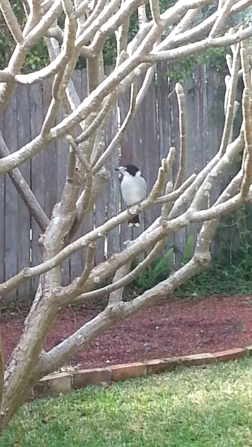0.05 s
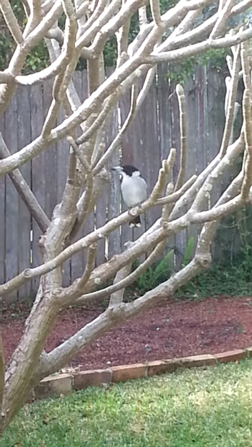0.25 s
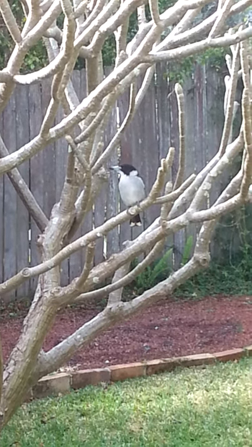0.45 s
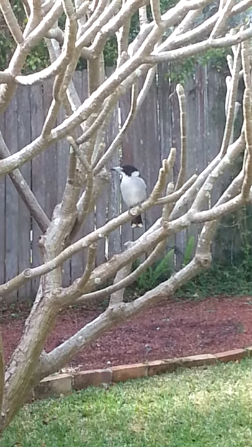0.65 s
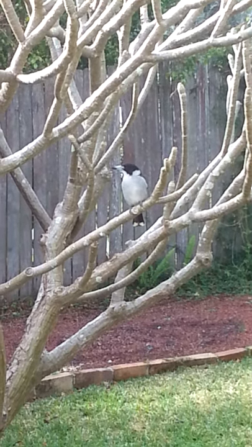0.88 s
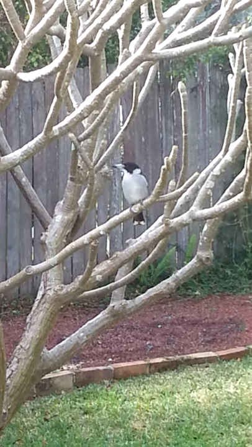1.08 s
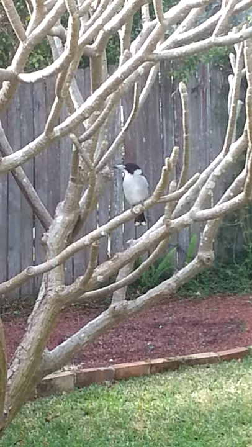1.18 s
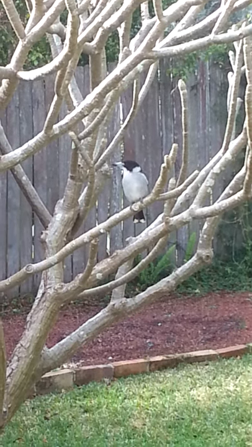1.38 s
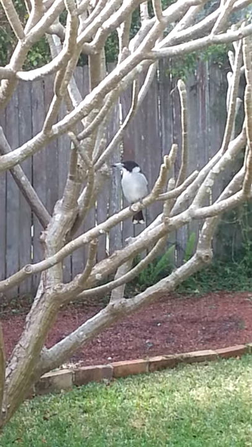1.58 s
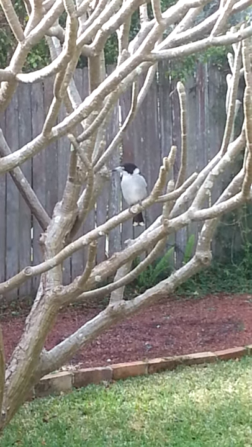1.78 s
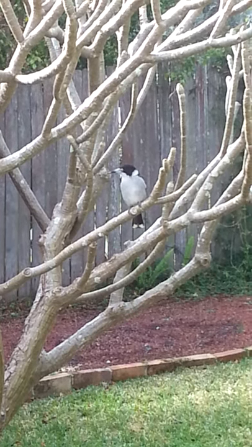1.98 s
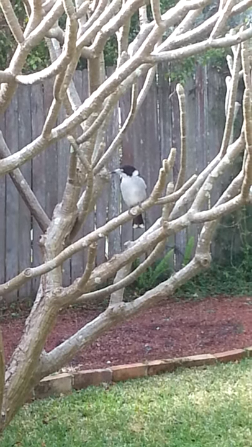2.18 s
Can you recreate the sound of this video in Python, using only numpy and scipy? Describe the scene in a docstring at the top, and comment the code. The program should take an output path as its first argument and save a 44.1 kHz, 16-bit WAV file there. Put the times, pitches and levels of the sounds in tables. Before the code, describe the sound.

Bird song at moderate distance in a backyard, picked up in stereo: clear falling whistle first, then harsh churr, nasal buzz, quick yelp, rough bark and low fluted notes, with faint outdoor wash and low hum.

```python
"""Butcherbird on a garden branch

A butcherbird sings a quiet phrase: gliding whistles and fluted notes between harsh rasps.
Whistles are a few harmonics on a jittering pitch glide; rasps drive throat resonances with pulses and noise.
The fence and house walls throw each note back as single echoes and a diffuse tail.
Behind it lie shaped noise as a soft outdoor wash and hiss, and a wavering sine as a faint low hum."""
import sys
import numpy as np
from scipy import signal
from scipy.fft import rfft, irfft
from scipy.io import wavfile
from scipy.ndimage import uniform_filter1d

SR = 44100
rng = np.random.default_rng(int(sys.argv[2]) if len(sys.argv) > 2 else 0)


def dump(signal):
    """Clip the signal to [-1, 1] and save it as 16-bit WAV at the path in sys.argv[1]."""
    limited = np.clip(np.atleast_2d(signal).T, -1, 1)
    pcm = np.round(limited * 32767).astype(np.int16)
    wavfile.write(sys.argv[1], SR, pcm)


N = 99225  # 2.25 s


def amp(db):
    """Decibels to gain."""
    return 10 ** (np.asarray(db) / 20)


def unit(x):
    """Scales to rms 1."""
    return x / np.sqrt(np.mean(x ** 2) + 1e-20)


def read(points, hz):
    """Reads a table on a log-frequency axis."""
    f, v = np.transpose(points)
    return np.interp(np.log(hz + 1), np.log(f + 1), v)


def shaped(x, db):
    """Filters by a gain curve in dB over the whole spectrum."""
    return irfft(rfft(x) * amp(db), N)


def wander(hz):
    """Smooth random motion up to a given rate, rms 1."""
    f = np.fft.rfftfreq(N, 1 / SR)
    return unit(irfft(rfft(rng.standard_normal(N)) / np.sqrt(1 + (f / hz) ** 6), N))


# Spectrum of outdoor wash and hiss. Each row: frequency in Hz, relative density in dB per Hz.
WASH = [(15, -26), (25, -17), (34, -25.5), (65, -28), (97, -19.5), (161, -13), (227, -7.5), (454, -6.5),
        (732, -11.5), (815, -5.5), (906, -10), (1150, -8), (2300, -17), (2700, -16.5), (4240, -18),
        (6480, -18), (14400, -20.5)]
# Level of the low wash over time. Each row: time in seconds, boost in dB at the lowest frequencies.
LOW_LEVEL = [(0, 4.5), (.25, 7), (.3, 11.5), (.44, 10), (.55, 7.5), (.8, 2.5), (.9, -3), (1.05, 6),
             (1.25, -0.5), (1.55, 6.5), (1.8, -1.5), (2.1, 3), (2.25, -3)]
# Likeness of the two microphones' wash. Each row: frequency in Hz, left-right correlation from 0 to 1.
LIKENESS = [(30, 0.17), (120, 0.68), (500, 0.69), (1200, 0.13), (3000, 0.067), (12000, 0.017)]
# Lean of the wash to one side. Each row: frequency in Hz, left over right in dB.
WASH_PAN = [(60, -1.5), (300, -3), (1000, -0.5), (12000, -1)]
WASH_DB = -61  # level before the low part's changes
LOW_TOP_HZ = 970  # the low boost in dB is halved here and fades above


def wash():
    """Distant outdoor noise over even hiss; its low part is louder around the bird's notes and lower in the
    gaps, as a table sets."""
    hz, t, z = signal.stft(rng.standard_normal((2, N)), SR, nperseg=2048)
    common = np.clip(read(LIKENESS, hz), -1, 1)[:, None]
    pan = read(WASH_PAN, hz)[:, None] / 2
    left = z[0] * amp(pan)
    right = (common * z[0] + np.sqrt(1 - common ** 2) * z[1]) * amp(-pan)
    steady = np.array([left, right]) * amp(read(WASH, hz))[:, None]
    scale = signal.istft(steady, SR)[1].mean(0).std()
    low_db = np.interp(t, *np.transpose(LOW_LEVEL)) / (1 + (hz[:, None] / LOW_TOP_HZ) ** 2)
    return amp(WASH_DB) / scale * signal.istft(steady * amp(low_db), SR)[1][:, :N]


# Loudness of the low hum. Each row: time in seconds, rms level in dB.
HUM = [(0, -89), (1.35, -81.5), (1.471, -69), (1.681, -72), (1.879, -80.5), (2.0, -75), (2.25, -85.5)]
HUM_HZ = 119  # mean pitch


def hum():
    """A faint sine of wavering pitch, the same at both microphones, strongest in the second half."""
    phase = 2 * np.pi * np.cumsum(HUM_HZ * (1 + 0.017 * wander(6.6))) / SR
    return unit(np.sin(phase)) * amp(np.interp(np.arange(N) / SR, *np.transpose(HUM)))


EDGE_S = 0.0032  # fade just outside each end of a gesture
JITTER_HZ, THROB_HZ = 306, 96  # fastest pitch jitter, mean throb rate


def syrinx(gesture, jitter, throb):
    """Phase and loudness of the syrinx: a jittering pitch glide with a fast throb."""
    t = np.arange(N) / SR
    s, hz, db = np.transpose(gesture)
    pitch = np.interp(t, s, hz) * (1 + jitter * wander(JITTER_HZ))
    phase = 2 * np.pi * np.cumsum(pitch) / SR
    throb_phase = 2 * np.pi * np.cumsum(THROB_HZ * (1 + 0.1 * wander(33))) / SR
    beat = unit(1 + throb * np.sin(throb_phase))
    gate = np.clip(np.minimum(t - s[0], s[-1] - t) / EDGE_S + 1, 0, 1)
    return phase, beat * gate * amp(np.interp(t, s, db))


# Gestures of the syrinx, one table per whistled note.
# Each row: time in seconds, pitch in Hz before jitter, relative level in dB at the bird.
CHIP = [(.115, 1920, -68), (.13, 2095, -62.5), (.142, 1645, -57.5), (.155, 1650, -70)]
NASAL = [(.165, 1244, -59), (.183, 1281, -54), (.204, 1192, -48.5), (.214, 1170, -52)]
LEAD_IN = [(.212, 2800, -57), (.235, 2597, -50.5), (.252, 2624, -49), (.27, 2554, -43.5), (.295, 2600, -52)]
ARCH = [(.267, 2745, -43.5), (.272, 2977, -44.5), (.279, 3294, -55), (.289, 3483, -48), (.298, 3104, -42),
        (.308, 2708, -39)]
WHISTLE = [(.306, 2660, -39), (.313, 2691, -32), (.323, 2685, -43), (.335, 2619, -32), (.344, 2550, -36),
           (.352, 2404, -47.5), (.379, 2356, -32), (.39, 2104, -55)]
UNDERTONE = [(.88, 867, -115), (.897, 855.5, -51.5), (.93, 856, -111), (.975, 848, -67), (1.0, 826, -56.5),
             (1.05, 805, -75), (1.12, 842, -54), (1.16, 874, -64)]
SLUR = [(.925, 1952, -67), (.942, 1697, -52.5), (.968, 1520, -61)]
BUZZ = [(.968, 1316, -55.5), (.99, 1334, -43.5), (1.019, 1358, -43), (1.034, 1389, -48), (1.05, 1303, -53),
        (1.078, 1310, -51.5)]
YELP = [(1.332, 1108, -57), (1.341, 1343, -51), (1.351, 1655, -42), (1.358, 1743, -38.5),
        (1.368, 1225, -47.5), (1.379, 1008, -49), (1.39, 1066, -47), (1.401, 920, -43), (1.423, 874, -44)]
SECOND_VOICE = [(1.36, 1770, -53), (1.385, 1676, -57), (1.398, 1662, -46), (1.412, 1800, -52)]
FLUTE = [(1.883, 971, -61), (1.902, 1048, -54.5), (1.916, 921, -55.5), (1.939, 975, -40.5),
         (1.951, 871, -44), (1.974, 901, -43.5), (1.992, 858, -46.5), (2.0, 865, -62)]
LIFT = [(2.015, 1269, -56.5), (2.038, 1430, -59), (2.06, 1613, -61.5), (2.074, 1460, -52.5),
        (2.082, 1410, -77)]
LAST = [(2.18, 1552, -73), (2.205, 1615, -64), (2.235, 1676, -57.5), (2.25, 1650, -70)]
PIP = [(2.185, 2340, -71), (2.195, 2260, -62), (2.208, 2000, -64)]
# The whistled notes. Each row: gesture, pitch jitter as an rms share, throb depth from 0 to 1,
# roughness from 0 to 1, list of relative harmonic levels in dB at full effort.
NOTES = [ (CHIP, 0.016, 0.11, 0.31, [0]), (NASAL, 0.016, 0.11, 0.42, [-2, -3, -4.5, -11, -17]),
         (LEAD_IN, .01, 0.094, 0.43, [0]), (ARCH, .007, .1, .18, [0, -8, -26]),
         (WHISTLE, .003, .05, .04, [0, -21, -28, -35]), (SLUR, 0.039, 0.38, 0.56, [0]),
         (BUZZ, 0.0333, 0.29, 0.71, [-9.5, -7.5, -16.5, -23, -29]), (UNDERTONE, 0.018, 0.073, 0.41, [0]),
         (YELP, 0.0195, 0.12, 0.37, [0]), (SECOND_VOICE, 0.0298, 0.18, 0.28, [0]),
         (FLUTE, 0.018, 0.074, 0.27, [0, -19.5]), (LIFT, 0.0085, 0.15, 0.43, [0]),
         (LAST, 0.011, 0.093, 0.17, [0]), (PIP, 0.016, .1, 0.26, [0])]
ROUGH_HZ = 121  # fastest flutter of a rough voice
MELLOW = 0.23  # overtones fade faster than the fundamental as effort falls (extra dB per dB, per octave)


def note(gesture, jitter, throb, rough, harmonics_db):
    """A few harmonics, brighter with effort, each fluttering on its own as the voice roughens."""
    phase, level = syrinx(gesture, jitter, throb)
    on, out = level > 0, np.zeros(N)
    s, _, effort_db = np.transpose(gesture)
    ease_db = MELLOW * (np.interp(np.flatnonzero(on) / SR, s, effort_db) - effort_db.max())
    flutter = wander(ROUGH_HZ) + 1j * wander(ROUGH_HZ)
    rough = np.clip(rough, 0, 1)
    for k, db in enumerate(harmonics_db, 1):
        # each harmonic takes the flutter from another moment
        own_flutter = np.roll(flutter, k * N // len(harmonics_db))[on] / np.sqrt(2)
        sway = 1 - rough + rough * own_flutter
        harmonic = unit((sway * np.exp(1j * k * phase[on])).real)
        out[on] += amp(db + ease_db * np.log2(k)) * harmonic
    out[on] = unit(out[on])
    return out * level


# Colour of the breath hiss. Each row: frequency in Hz, relative gain in dB.
AIR = [(100, -30), (300, -42), (1200, -4), (4000, 5), (14000, -19)]
AIR_DB = -26  # relative to the voice


def air(voice):
    """A faint hiss that rises and falls with the voice."""
    level = np.sqrt(abs(uniform_filter1d(voice ** 2, size=400)))  # 9 ms rms
    hiss = unit(shaped(rng.standard_normal(N), read(AIR, np.fft.rfftfreq(N, 1 / SR))))
    return amp(AIR_DB) * level * hiss


# Lean of the bird to one side. Each row: frequency in Hz, left over right in dB.
BIRD_PAN = [(700, -2), (1400, 0), (2000, -0.5), (2750, 6), (3300, 0), (4200, -3), (6000, -12), (9000, 3.5)]
MIC_LAG_S = .00009


def at_microphones(bird):
    """The bird reaches the left microphone slightly later, each band leaning to one side."""
    hz = np.fft.rfftfreq(N, 1 / SR)
    pan = read(BIRD_PAN, hz) / 2
    late = irfft(rfft(bird) * np.exp(-2j * np.pi * hz * MIC_LAG_S), N)
    return np.array([shaped(late, pan), shaped(bird, -pan)])


# Single reflections. Each row: mean delay in seconds, gain at left, gain at right.
ECHOES = [(.0062, 0.18, 0.27), (0.014, 0.14, .15), (0.0206, .19, .19), (0.035, 0.16, 0.21),
          (0.042, 0.23, 0.17), (.092, .1, 0.14), (0.129, .07, .07)]
# Decay of the diffuse tail. Each row: frequency in Hz, time to fall 60 dB in seconds.
GARDEN_T60 = [(300, 0.85), (1000, 0.37), (2500, 0.45), (5000, 0.17), (14000, 0.66)]
# Colour of the diffuse tail. Each row: frequency in Hz, relative gain in dB.
TAIL_COLOUR = [(300, -19), (900, 0), (1600, 0.5), (2700, -1.5), (4500, -3), (14000, 2)]
GARDEN_DB, DIRECT_DB = -1.5, -1  # gains of tail and direct sound
TAIL_RISE_S = 0.007


def garden(x):
    """Direct sound, slaps from ground and fence, and a diffuse tail from walls and foliage."""
    out = amp(DIRECT_DB) * x
    for delay, left, right in ECHOES:
        for ch, gain in enumerate((left, right)):
            # each path strays by about 0.3 ms
            lag = round(abs(delay + .0003 * rng.standard_normal()) * SR) + 1
            out[ch, lag:] += gain * x[ch, :-lag]
    hz, t, z = signal.stft(rng.standard_normal((2, SR)), SR, nperseg=256)
    decay_db = -60 * t / read(GARDEN_T60, hz)[:, None]
    rise = np.minimum(t / TAIL_RISE_S, 1)
    z = z * amp(read(TAIL_COLOUR, hz)[:, None] + decay_db) * rise
    tail = signal.istft(z, SR, nperseg=256)[1]
    tail /= np.sqrt(SR * .5 / np.log(1e6))  # energy of plain noise falling 60 dB in 0.5 s
    return out + amp(GARDEN_DB) * signal.fftconvolve(x, tail, axes=1)[:, :N]


# Gestures of the rasps. Each row: time in seconds, pitch in Hz before jitter, relative level in dB at the bird.
CHURR = [(.53, 905, -61.5), (.575, 929.7, -54.5), (.6, 977.6, -45), (.618, 966, -49), (.638, 989, -45.5),
         (.655, 958, -52)]
BARK = [(1.534, 1046, -52), (1.546, 1064, -41.5), (1.56, 1017, -38.5), (1.573, 901, -47.5),
        (1.6, 800, -46.5)]
# The rasps. Each row: gesture, pitch jitter as an rms share, turbulence in dB relative to the pulses,
# brightness in dB per octave.
RASPS = [(CHURR, 0.13, -0.88, 0), (BARK, 0.0754, 0.66, -0.72)]
# Throat resonances during a rasp. Each row: frequency in Hz, relative gain in dB before brightness.
THROAT = [(80, -55), (300, -41), (680, -11.5), (860, 1), (1020, -9), (1350, -12.5), (1720, -0.5),
          (2170, -3), (2430, -11), (2680, -9.5), (3480, -16), (3750, -8), (4050, -11.5), (4400, -16),
          (5300, -23), (5950, -16), (6400, -21), (7800, -25), (14000, -34)]
RASP_THROB = 0.57  # depth, 0 to 1


def rasp(gesture, jitter, air_db, tilt_db):
    """Chaotic pulses and turbulent air ring the resonances of the throat."""
    phase, level = syrinx(gesture, jitter, RASP_THROB)
    hz = np.fft.rfftfreq(N, 1 / SR)
    pulses = unit(sum(np.cos(k * phase) for k in range(1, 13)))
    drive = pulses + amp(air_db) * rng.standard_normal(N)
    return level * unit(shaped(drive, read(THROAT, hz) + tilt_db * np.log2(hz + 1)))


def scene():
    """The bird's voice and breath, heard in the garden over the wash and hum."""
    voice = sum(note(*row) for row in NOTES) + sum(rasp(*row) for row in RASPS)
    bird = voice + air(voice)
    return garden(at_microphones(bird)) + wash() + hum()


CUT_HZ = 14550


def record(dry):
    """The recorder's band limit, a steep low-pass."""
    low_pass = signal.firwin(1501, CUT_HZ, window=("kaiser", 9), fs=SR)
    return signal.oaconvolve(dry, low_pass[None], "same")


dry = scene()
out = record(dry)
dump(out)
```